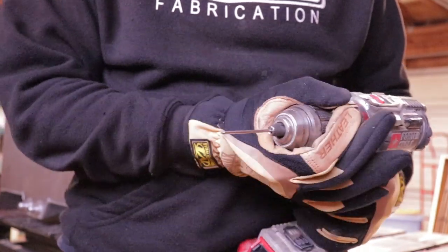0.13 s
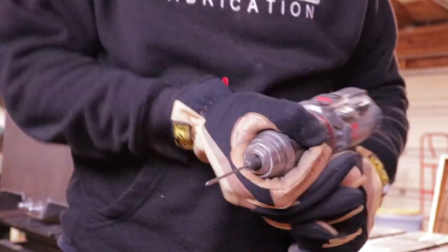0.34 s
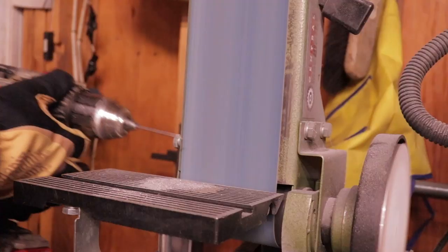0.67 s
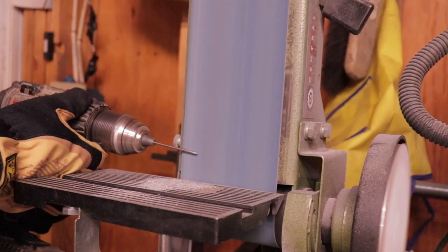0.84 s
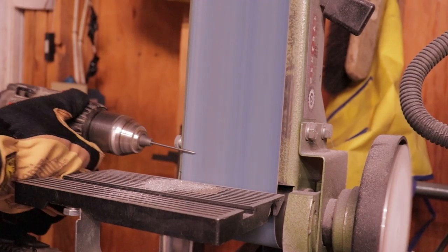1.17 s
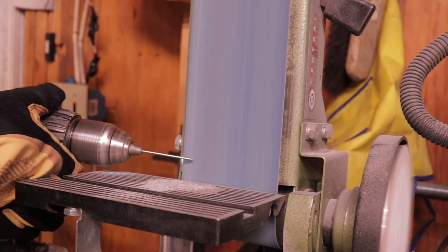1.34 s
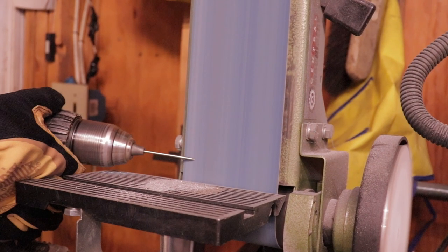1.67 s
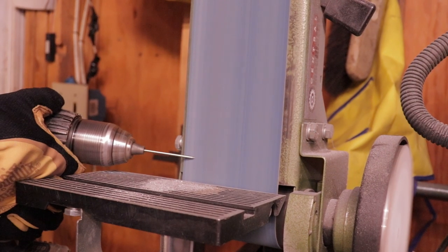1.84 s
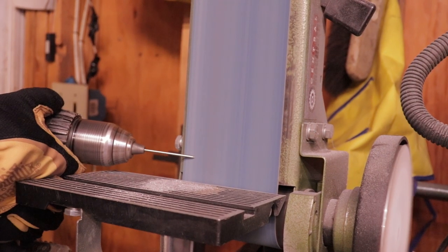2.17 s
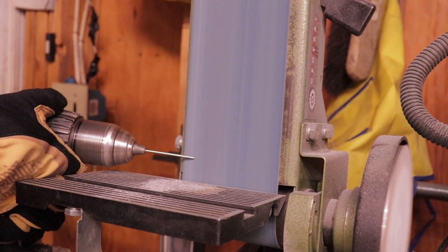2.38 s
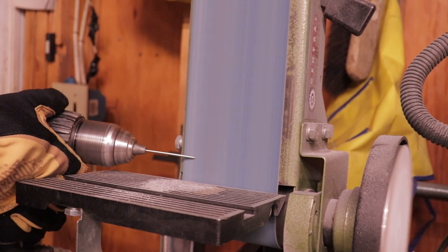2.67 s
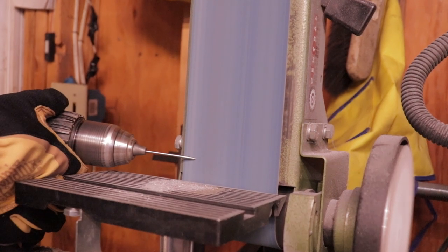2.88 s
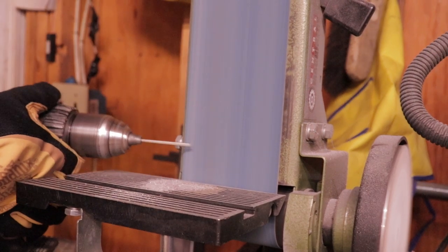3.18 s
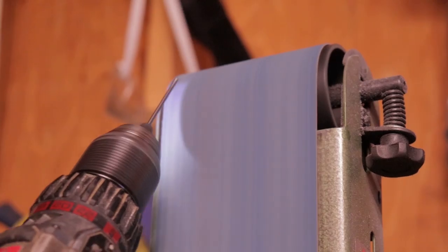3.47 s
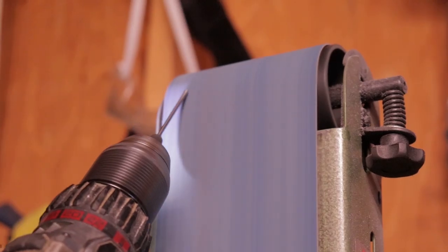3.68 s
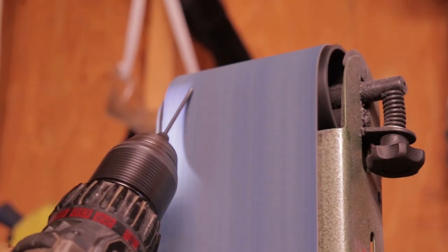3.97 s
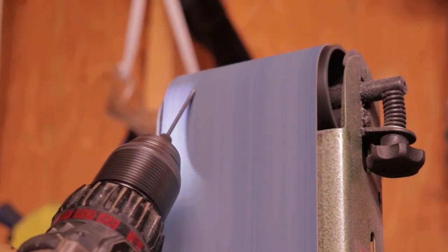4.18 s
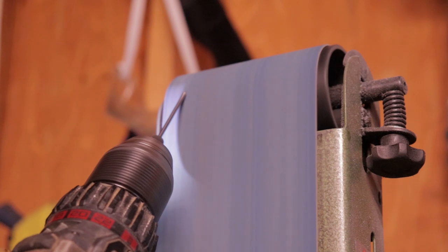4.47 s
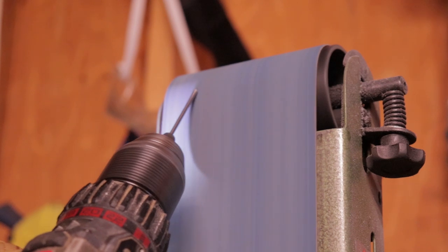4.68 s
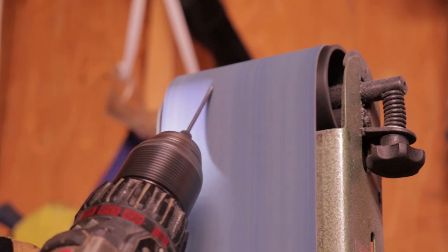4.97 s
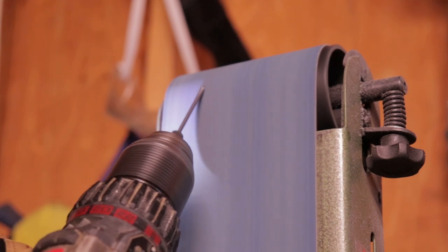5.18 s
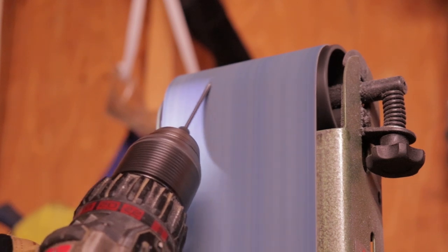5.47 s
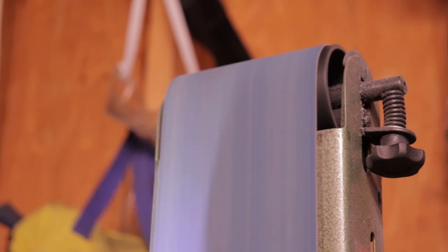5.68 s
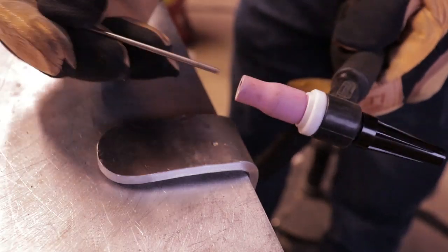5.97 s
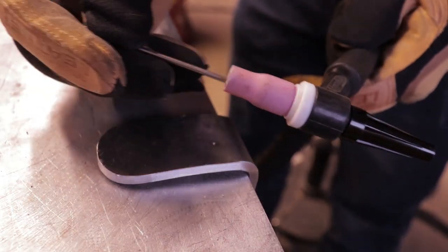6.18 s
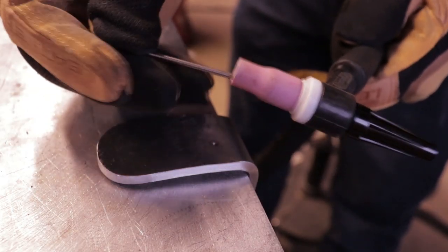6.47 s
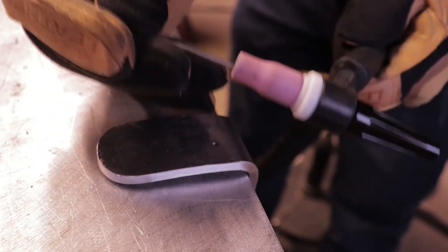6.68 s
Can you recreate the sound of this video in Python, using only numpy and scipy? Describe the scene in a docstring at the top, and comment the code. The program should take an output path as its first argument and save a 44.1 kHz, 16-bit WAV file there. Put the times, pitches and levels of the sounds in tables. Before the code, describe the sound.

A close view of a small workshop with short reflections. Low airy room noise and soft glove rubbing open the scene. At about 0.2 s a cordless drill blips: click, quick rising and falling geared whir with a thin electric whine, then a loud sharp chuck snap near 0.37 s and smaller clicks up to 0.65 s. Immediately a rod grinds on a sanding belt, a dense gritty hiss with midrange metallic ringing, wavering in pressure until 1.5 s. From 1.55 to 3.2 s the touch is lighter, with a thin high sizzle and singing tip. Near 3.2 s the ring becomes stronger, subtly throbbing, with a faint very high whine; the hiss slowly wanes. At 5.8 s grinding stops abruptly. A quiet low fan hum remains, with glove rustles and small bright ceramic ticks and scrapes around 6.3, 6.4 to 6.5 and 6.8 s.

```python
"""Sharpening a tungsten rod

A gloved hand grips a cordless drill's chuck, and a blip of the trigger clamps it on the rod: geared whir and clicks.
The spinning rod is ground on a belt sander, first low on the belt, then harder near the top roller:
dense grit impacts ring the machine and hiss, and the rod's tip sizzles and sings.
Then, over a humming fan at the welding bench, the rod ticks and scrapes into the ceramic cup of a torch."""
import sys
import numpy as np
from scipy import signal
from scipy.fft import rfft, irfft
from scipy.io import wavfile
from scipy.ndimage import uniform_filter1d

SR = 44100
rng = np.random.default_rng(int(sys.argv[2]) if len(sys.argv) > 2 else 0)


def dump(signal):
    """Clip the signal to [-1, 1] and save it as 16-bit WAV at the path in sys.argv[1]."""
    limited = np.clip(np.atleast_2d(signal).T, -1, 1)
    pcm = np.round(limited * 32767).astype(np.int16)
    wavfile.write(sys.argv[1], SR, pcm)


N = 301644
T = np.arange(N) / SR
HZ = np.maximum(np.arange(N // 2 + 1) * SR / N, 1)
LEFT_RIGHT = np.array([[1], [-1]])
GRIND_START_S, GRIND_END_S = 0.655, 5.789


def undb(db):
    """Level: 20 dB is a tenfold gain in amplitude."""
    return 10 ** (np.asarray(db) / 20)


def unit(x):
    """Effective value: scale to rms 1."""
    return x / np.sqrt(np.mean(x ** 2))


def curves(rows):
    """Linear interpolation: each column after the first as a line through time."""
    s, *columns = np.transpose(rows)
    return [np.interp(T, s, column) for column in columns]


def between(start, end, fade=0.004):
    """Gating: 1 from start to end, with short ramps centred on both."""
    return np.clip(np.minimum(T - start, end - T) / fade + .5, 0, 1)


def swells(rows):
    """Gaussian envelopes: strokes that swell and fade, down to 1/e at the half length."""
    return sum(undb(db) * np.exp(-((T - s) / half) ** 2) for s, half, db in rows)


def walk(rate):
    """Random modulation: levels held 1 / rate s and smoothed twice, spread 1."""
    hold = int(SR / rate)
    steps = np.repeat(rng.standard_normal(N // hold + 1), hold)
    return unit(uniform_filter1d(uniform_filter1d(steps, hold), hold)[:N])


def grit(per_s, spread_db):
    """Shot noise: a dense train of tiny impacts of uneven size and either sign."""
    struck = rng.random(N) < per_s / SR
    size = rng.standard_normal(N) * undb(spread_db * rng.standard_normal(N))
    return unit(struck * size)


def contour(points):
    """Spectral envelope: dB at every frequency, interpolated over log frequency."""
    hz, db = np.transpose(points)
    return np.interp(np.log(HZ), np.log(hz), db)


def colour(x, points, modes=()):
    """Linear filtering: a spectral envelope plus resonances, each radiating more to one side."""
    db = contour(points)
    for hz, width, lift, pan in modes:
        bell = 1 / (1 + (2 * (HZ - hz) / width) ** 2) ** 2
        db = db + (lift + LEFT_RIGHT * pan / 2) * bell
    return irfft(rfft(x) * undb(db), N)


def panned(x, left_db):
    """Level difference between the ears: left minus right."""
    return x * undb(LEFT_RIGHT / 2 * left_db)


# sideways share of the reflections and of the air noise, before each source's offset: pitch_hz, level_db
SIDE_SHARE = [(100, -25), (700, -24.5), (1400, -21.5), (2400, -8.5), (4400, -5), (8200, -2), (15000, -2.5)]


def room(x, wet_db, side_db, t60=0.21):
    """Reverberation: direct sound plus dying reflections, unlike at the ears mostly in the treble."""
    def reflections():
        return rfft(unit(rng.standard_normal(N) * undb(-60 * T / t60))) / np.sqrt(N)

    common = undb(wet_db) * reflections()
    side = reflections() * undb(contour(SIDE_SHARE) + side_db) * LEFT_RIGHT
    return irfft(rfft(x) * (1 + common + side), N) / np.hypot(1, undb(wet_db))


def knocks(rows, body, ring_db, ring_s, size=2048):
    """Impact: each contact is a sharp push and a brief rattle, coloured by the struck body."""
    out = np.zeros(N + size)
    for s, db, tilt_db in rows:
        # minimum phase through the cepstrum, so that nothing rings before the contact
        spectrum_db = contour(body) + tilt_db * np.log2(np.maximum(HZ, 1000) / 5000)
        cepstrum = irfft(np.log(undb(spectrum_db)), N)
        causal = 2 * cepstrum * (T > 0) * (T < T[-1] / 2)
        push = irfft(np.exp(rfft(causal)), N)[:size]
        rattle = undb(ring_db) * rng.standard_normal(size) * np.exp(-T[:size] / ring_s)
        hit = push + signal.fftconvolve(push, rattle)[:size]
        first = int(s * SR)
        out[first:first + size] += undb(db) * hit / np.abs(hit).max()
    return out[:N]


def rubs(force, body, per_s):
    """Friction: dense little catches, as loud as the force behind them."""
    return force * unit(colour(grit(per_s, spread_db=1), body))


def air(spectrum, db, side_db=6.5):
    """Broadband flow noise: gently churning, alike at both ears in the bass."""
    mid, side = rng.standard_normal((2, N))
    field = mid + undb(side_db) * colour(side, SIDE_SHARE) * LEFT_RIGHT
    return unit(colour(field, spectrum)) * undb(db + .5 * walk(12))


# spectrum of the workshop air at the drill: pitch_hz, level_db
SHOP_AIR = [(18, -67), (30, -39), (64, -27), (118, -13), (215, -7), (280, -1), (512, -3), (866, -6.5),
            (1630, -18), (2830, -20), (3770, -28.5), (7670, -36), (10500, -36), (11400, -39), (16000, -42)]


def shop_air(start_db=-38.5, fade_db_per_s=5.5):
    """Diffuse field: the noise of the workshop air dies down before the sanding."""
    return air(SHOP_AIR, start_db - fade_db_per_s * np.minimum(T, 1)) * between(-1, .663)


# strokes of the glove: centre_s, half_length_s, level_db
GLOVE_STROKES = [(.07, 0.048, -55.5), (.53, 0.023, -46.5), (5.829, .0089, -39.5), (5.89, 0.077, -51.5),
                 (6.243, 0.018, -46), (6.592, 0.015, -50), (6.695, 0.0096, -57)]
# spectrum of the rubbing glove: pitch_hz, level_db
GLOVE_SPECTRUM = [(1500, -19), (3500, -5.5), (5000, -1), (9000, -2), (13000, -1.5), (16000, -9)]


def glove(fidget_db=-65, fidget_spread_db=6.5, fidget_per_s=22):
    """Friction: the glove rubs in strokes over a faint, restless stirring."""
    fidget = undb(fidget_db + fidget_spread_db * walk(fidget_per_s))
    rustle = rubs(swells(GLOVE_STROKES) + fidget, GLOVE_SPECTRUM, per_s=15000)
    return room(rustle, wet_db=-12, side_db=-2)


# trigger half pulled, pulled home and let go: start_s, share of full motor speed asked for, ramp_s
TRIGGER_PULLS = [(.186, 0.39, .022), (.243, 0.98, 0.036), (.31, 0.14, .025)]


def motor_speed():
    """Inertia: the motor eases to each speed that the trigger asks for."""
    speed = np.zeros(N)
    for s, share, ramp_s in TRIGGER_PULLS:
        eased = np.sin(np.pi / 2 * np.clip((T - s) / ramp_s, 0, 1)) ** 2
        speed = speed + (share - speed) * eased
    return speed


# gear tones at full speed: pitch_hz, level_db above the gear noise
GEAR_MESH = [(1935, -8), (2580, -9), (2900, -11), (3225, -11), (5805, -10)]
# spectrum of the gearbox: pitch_hz, level_db
GEARBOX_SPECTRUM = [(710, -39), (1200, -20), (1630, -10), (1870, -9), (2110, -1.5), (3080, -4),
                    (3870, -11.5), (5530, -8), (7820, -14), (14000, -14.5), (16000, -25)]
# the jaws rattle shut on the rod: centre_s, half_length_s, level_db
JAW_RATTLE = [(.368, 0.0073, -29)]
# clicks of chuck and trigger: start_s, peak level_db, treble tilt_db per octave
CHUCK_AND_TRIGGER = [(.185, -25, 8), (.2008, -13.5, -3.5), (.319, -13, -4), (.368, -25, 0),
                     (.3748, -5.5, 3.5), (.4155, -28, 7), (.476, -27, 2), (.493, -30, 4), (.645, -17, 7),
                     (.653, -22, 0)]
# gear noise at full speed, its change at standstill, and how fast it dies once the chuck has clamped
GEAR_DB, GEAR_IDLE_DB, GEAR_FADE_DB_PER_S = -27.5, -16.5, 450
BLIP_START_S, BLIP_END_S = 0.19, 0.374


def drill_blip(switch_hz=12900, pole_hz=1320, whine_db=-6.0, carrier_db=-8, waver_hz=110):
    """Gear meshing: teeth chatter and sing with motor speed; the drive whines above its switching rate."""
    speed = motor_speed()
    level_db = GEAR_DB + GEAR_IDLE_DB * (1 - speed) - GEAR_FADE_DB_PER_S * np.maximum(T - BLIP_END_S, 0)
    turn = 2 * np.pi * np.cumsum(speed * (1 + 0.0072 * walk(330))) / SR
    tones = sum(undb(db) * np.sin(hz * turn) for hz, db in GEAR_MESH)
    switching = 2 * np.pi * np.cumsum(switch_hz + waver_hz * walk(900)) / SR
    whine = undb(whine_db) * np.sin(switching + pole_hz * turn) * np.sqrt(np.abs(speed))
    whine = whine + undb(carrier_db) * np.sin(switching) * (1 - speed)
    chatter = unit(colour(grit(16000, spread_db=3.0), GEARBOX_SPECTRUM))
    drive = chatter + np.sqrt(2) * (speed * tones + whine * between(0.14, 0.35))
    drive = drive * undb(level_db) * between(BLIP_START_S, GRIND_START_S)
    jaws = chatter * swells(JAW_RATTLE)
    clicks = knocks(CHUCK_AND_TRIGGER, GEARBOX_SPECTRUM, ring_db=-26, ring_s=.002)
    return room(drive + jaws + clicks, wet_db=-8.5, side_db=-1.5)


# pressure of the rod on the belt, as the level of the machine's ring before a small offset: time_s, level_db
ROD_PRESSURE = [(.67, -29), (.69, -28), (.9, -28), (.97, -31.5), (1.03, -30), (1.08, -35), (1.2, -33.5),
                (1.3, -29), (1.37, -29), (1.44, -27), (1.5, -27.5), (1.55, -34), (1.9, -36.5),
                (3.16, -37.5), (3.24, -29.5), (5.78, -30)]
# spectrum of sander and drill body: pitch_hz, level_db
MACHINE_SPECTRUM = [(30, -51), (100, -50.5), (200, -41), (400, -36.5), (750, -27.5), (950, -22.5),
                    (1400, -14.5), (1750, -13.5), (2250, -5.5), (2580, -12), (3600, -20), (4800, -18.5),
                    (6500, -23.5), (16000, -38)]
# their resonances: pitch_hz, width_hz, lift_db, left minus right_db
MACHINE_MODES = [(474, 66, 10, -0.5), (911, 44, 7, 0.5), (1150, 100, 7.5, -2), (1364, 91, 4.5, 2),
                 (1513, 26, 5.5, -1), (1850, 220, 4.5, 4.5), (2072, 75, 5.5, 6.5), (2304, 240, 6, 6),
                 (2423, 98, 8.5, -3), (2752, 145, 12.5, 0.5), (2845, 78, 7.5, 10), (3207, 110, 7, 6),
                 (4094, 140, 7.5, 5.5), (4385, 216, 10, -1.5), (4700, 190, 5, 6)]
# spectrum of the hiss: pitch_hz, level_db
HISS_SPECTRUM = [(1000, -33), (3500, 2), (5500, -4), (7500, 3.5), (11000, 0.5), (14000, -0.5), (16000, -7)]
# resonances in the hiss: pitch_hz, width_hz, lift_db, left minus right_db
HISS_RESONANCES = [(6890, 550, 4, -2), (8440, 2600, -2.5, -5), (9310, 330, 6, -1)]
# spectrum of the sizzle: pitch_hz, level_db
SIZZLE_SPECTRUM = [(3000, -45), (11500, -20), (13200, 2), (14200, -2), (16000, -6)]
# flares of the sizzle: centre_s, half_length_s, level_db
SIZZLE_FLARES = [(1.08, 0.15, -36.5), (2.85, 0.32, -42), (5.25, 0.47, -42)]
# spectrum of the singing tip: pitch_hz, level_db
TIP_SPECTRUM = [(3000, -44), (8000, -20), (12000, -13), (14000, -12.5), (16000, -6.5)]
# resonances of the singing tip: pitch_hz, width_hz, lift_db, left minus right_db
TIP_RESONANCES = [(10440, 1700, 14, 2), (12970, 860, 13.7, 2), (13280, 490, 10, 3), (15000, 1000, 10.5, 2)]
# a firm and a light touch; the hand's unsteadiness at a firm touch, which tells more when it is light
FIRM_DB, LIGHT_DB, TREMOR_DB = -30, -36.3, 0.39
# hiss at a firm touch, and its change per dB of pressure
HISS_DB, HISS_PER_DB = -32.5, 0.61
# near the top roller the hiss is softer and wanes as the point forms
ROLLER_S, ROLLER_HISS_DB, WANE_DB_PER_S, ROLLER_HZ = 3.2, -0.5, 0.95, 96.9
# tip at a light touch, and dB lost per dB of added pressure
SING_DB, SING_DAMPING = -35, 3.9
SIZZLE_DB, SIZZLE_DAMPING = -46.5, 0.82


def grinding(hiss_throb=0.089, judder_db=0.3, ring_db=1.02, lean_db=0.5):
    """Abrasion: grit strikes the rod, throbbing with the roller's turns, and excites machine and tip."""
    push, = curves(ROD_PRESSURE)
    press = push + TREMOR_DB * undb(FIRM_DB - push) * walk(16)
    roller_hiss_db = (T > ROLLER_S) * (ROLLER_HISS_DB - WANE_DB_PER_S * (T - ROLLER_S))
    hiss_db = HISS_DB + HISS_PER_DB * (push - FIRM_DB) + roller_hiss_db
    # more pressure damps the tip
    load = np.maximum(push - LIGHT_DB, 0)
    singing = undb(SING_DB - SING_DAMPING * load)
    sizzle = undb(SIZZLE_DB - SIZZLE_DAMPING * load) + swells(SIZZLE_FLARES)

    # each turn of the roller presses the belt against the rod, which judders in the hand
    turn = 2 * np.pi * np.cumsum(ROLLER_HZ * (1 + 0.01456 * walk(12))) / SR
    bump = np.cos(turn) + .5 * np.cos(2 * turn)
    contact = undb(judder_db * walk(140)) * between(GRIND_START_S, GRIND_END_S)
    coarse = grit(14000, spread_db=1.2) * (1 + .23 * bump)
    fine = grit(25000, spread_db=4.5) * (1 + hiss_throb * bump) * undb(1.6 * walk(180))

    coarse = room(coarse, wet_db=-12.5, side_db=0, t60=0.39)
    ring = unit(colour(coarse, MACHINE_SPECTRUM, MACHINE_MODES)) * undb(press + ring_db) * contact
    ring = panned(ring, lean_db * np.clip(T - ROLLER_S, 0, 1))  # leans left near the top roller
    fine = room(fine, wet_db=-9.0, side_db=0.5)
    spray = unit(colour(fine, HISS_SPECTRUM, HISS_RESONANCES)) * undb(hiss_db)

    # the sharpest grains sizzle; a steady light touch lets the rod's high modes sing
    sharp = room(grit(20000, spread_db=3.5), wet_db=-21, side_db=-10.5) * undb(0.76 * walk(110))
    tip = unit(colour(sharp, SIZZLE_SPECTRUM)) * sizzle
    tip = tip + unit(colour(sharp, TIP_SPECTRUM, TIP_RESONANCES)) * singing
    return ring + (spray + tip) * between(GRIND_START_S - .003, GRIND_END_S)


# the drill's thin whine, before its waver: time_s, pitch_hz
WHINE_PITCH = [(3.3, 11656), (4.54, 11580), (5.6, 11574)]


def drill_whine(start_s=3.27, end_s=5.705, level_db=-43.5, lag_rad=1.25):
    """Interaural phase: the motor drive's whine, sagging in pitch, lags in the right ear."""
    hz, = curves(WHINE_PITCH)
    phase = 2 * np.pi * np.cumsum(hz + 10 * walk(70)) / SR
    swell_db = np.interp(T, [3.3, 4.2], [-3, 0])
    level = undb(level_db + swell_db + 1.6 * walk(50)) * between(start_s, end_s)
    return np.sqrt(2) * np.sin(phase - np.array([[0], [lag_rad]])) * level


# spectrum of the air at the bench: pitch_hz, level_db
BENCH_AIR = [(18, -73), (30, -49), (124, -23), (184, -12), (486, -9), (584, -3), (913, -13.5), (988, -12.5),
             (1320, -18), (1670, -19), (1860, -19), (2410, -21.5), (3670, -27.5), (13000, -39.5),
             (16000, -37)]
# hum of the fan's blades, before a common trim: pitch_hz, level_db
FAN_HUM = [(194, -62.5), (522, -62.5), (576, -57), (877, -72), (974, -60.5)]


def bench_fan(air_db=-47.5, hum_trim_db=-1):
    """Blade tones: a fan's blades hum, wavering in pitch and level, within the noise of the air."""
    hum = 0
    for hz, db in FAN_HUM:
        level = undb(db + hum_trim_db + 2 * walk(12))
        hum = hum + level * np.sin(2 * np.pi * np.cumsum(hz + 2 * walk(15)) / SR)
    bench = panned(air(BENCH_AIR, air_db) + np.sqrt(2) * hum, left_db=2.0)
    return bench * between(GRIND_END_S, T[-1] + 1)


# the rod taps the cup: start_s, peak level_db, treble tilt_db per octave
ROD_TAPS = [(6.204, -33, -2), (6.214, -32, 0), (6.2887, -17, 1), (6.4074, -36, -8), (6.4682, -12, 5),
            (6.5297, -23, -5), (6.616, -40, 6), (6.659, -34, 4), (6.7505, -40, -5), (6.8055, -13, 0),
            (6.8125, -10, -0.5)]
# spectrum of the struck cup: pitch_hz, level_db
CUP_SPECTRUM = [(300, -25), (1500, -13), (3000, -7), (4400, 2.5), (7000, -6), (11000, -7), (16000, -15.5)]
# the rod slides on the ceramic: centre_s, half_length_s, level_db
ROD_SLIDES = [(5.829, 0.007, -54), (5.975, 0.017, -49), (6.353, .006, -50.5), (6.4075, 0.0045, -33.5),
              (6.466, 0.0029, -31), (6.582, 0.0068, -53), (6.808, .003, -37.5)]
# spectrum of the scraped ceramic: pitch_hz, level_db
SCRAPE_SPECTRUM = [(1500, -23), (3000, -8), (4400, 3), (5500, 0), (7500, -19), (16000, -26)]


def torch_cup():
    """Impact and friction: the rod ticks and scrapes as it finds the mouth of the cup."""
    ticks = knocks(ROD_TAPS, CUP_SPECTRUM, ring_db=-9, ring_s=.0002)
    slides = rubs(swells(ROD_SLIDES), SCRAPE_SPECTRUM, per_s=15000)
    return room(ticks + slides, wet_db=-19, side_db=-5)


def scene():
    """Superposition: drill, sander and torch in turn, with the air around them and the glove."""
    machines = drill_blip() + grinding() + drill_whine()
    return shop_air() + glove() + machines + bench_fan() + torch_cup()


def record(dry, top_hz=15900):
    """Band limiting: a steep elliptic low-pass cuts the top."""
    return signal.sosfilt(signal.ellip(10, .2, 70, top_hz, fs=SR, output="sos"), dry)


dry = scene()
out = record(dry)
dump(out)
```